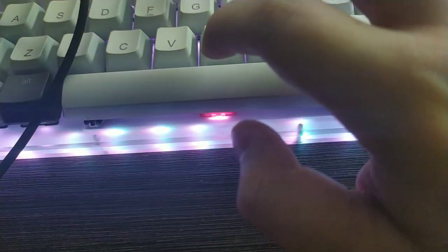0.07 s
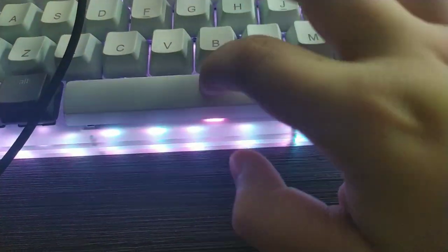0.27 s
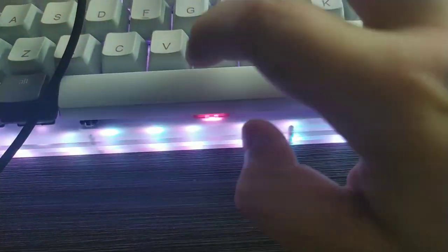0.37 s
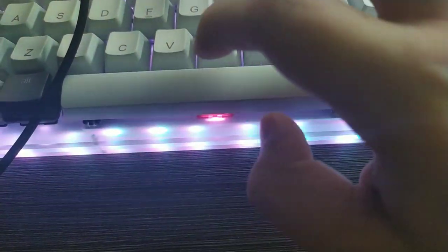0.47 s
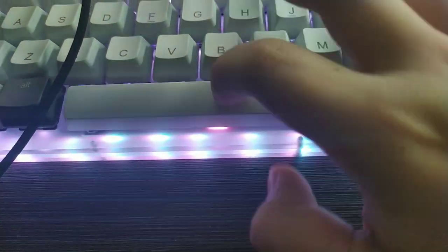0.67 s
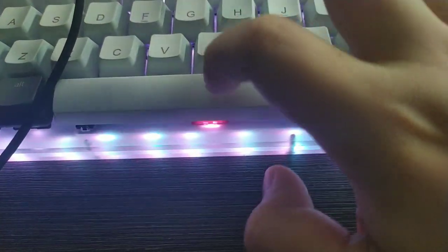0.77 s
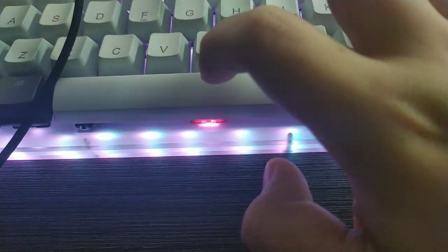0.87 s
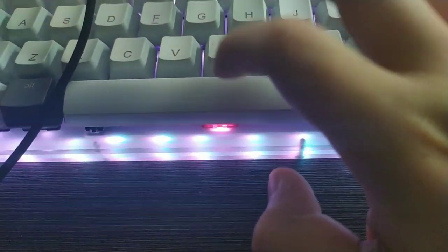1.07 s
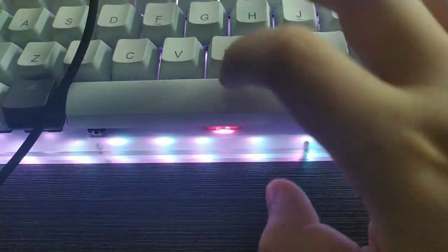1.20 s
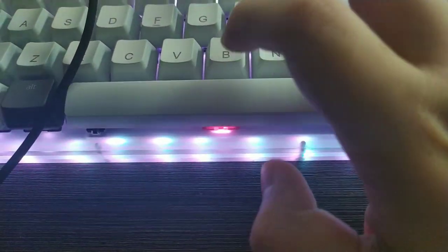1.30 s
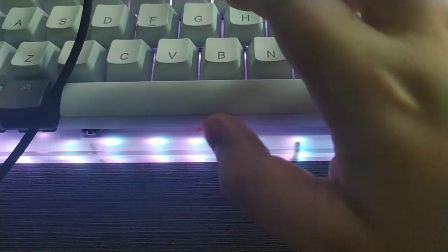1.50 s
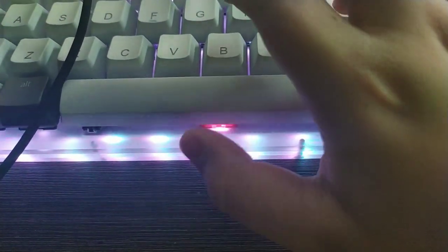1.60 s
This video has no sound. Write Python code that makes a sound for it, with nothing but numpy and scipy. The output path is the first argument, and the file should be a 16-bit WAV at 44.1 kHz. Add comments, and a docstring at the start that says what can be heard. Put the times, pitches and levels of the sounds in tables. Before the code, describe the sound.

A mechanical keyboard's spacebar is struck three times at an even pace. Each sharp plastic clack is followed by a duller click as it springs back, with low desk thuds underneath, close to the microphone in a quiet room.

```python
"""Three sharp clacks sound close by in a quiet room: a finger strikes a mechanical keyboard's spacebar.
Each stroke is a soft touch, a hard clack as the plastic bar bottoms out and a duller one as it springs
back. Every impact excites the damped modes of bar, plate and case; the switch spring rings faintly.
The desk booms under the blows and rumbles with the moving hand; the room answers with a weak tail."""
import sys
import numpy as np
from scipy import signal
from scipy.fft import rfft, irfft, next_fast_len
from scipy.io import wavfile

SR = 44100
rng = np.random.default_rng(int(sys.argv[2]) if len(sys.argv) > 2 else 0)


def unload_wav(signal):
    """Save mono or channel-first audio to the path in sys.argv[1] as 16-bit WAV at rate SR, clipped to [-1, 1]."""
    wavfile.write(
        sys.argv[1],
        SR,
        np.round(np.clip(np.atleast_2d(signal).T, -1, 1) * 32767).astype(np.int16),
    )


N = 72765
T = np.arange(N) / SR

# The bar bottoms out. Each row: start in seconds, ring level in dB, brightness in dB per octave,
# upper-mode snap in dB, crack level in dB, crack tilt in dB per octave, room in dB, desk boom in dB.
PRESSES = [(0.2364, 1.63, .5, -1.7, -2.5, -2.5, -2, 1), (0.6989, -1.24, -0.8, 4, -2.5, 1, 1.5, 3),
           (1.1470, 2.3, 1, -3.5, -6.5, -6.5, -2, -0.5)]
# The bar springs back to its stop. Each row: as for a press.
RELEASES = [(0.3134, 0.33, -0.31, 4.5, -4.5, -17.5, -8, -14.5),
            (0.7915, -3.5, -2.3, 2.3, -18, -1, -13, -12.5),
            (1.2298, 0.1, 0.64, -3.5, -11, -8.5, -10.5, -12)]
# Light contacts of finger and loose bar. Each row: start in seconds, level in dB.
TOUCHES = [(0.2242, -36), (.6900, -39), (1.1352, -37), (0.303, -33), (0.768, -41), (0.7858, -30.5),
           (1.2220, -47)]
# Modes of bar, plate and case. Each row: frequency in Hz, T60 in seconds, press and release levels in dB.
MODES = [(250, 0.064, -29, -31.5), (326.2, 0.069, -29.5, -36), (415, 0.044, -18, -21),
         (567, 0.007, -10.5, -14.5), (716, .046, -19.5, -18.5), (930, .03, -29, -38),
         (1039, 0.021, -22, -24), (1122, 0.05, -29.5, -30), (1282, .023, -17, -18),
         (1442, .025, -22, -20.5), (2118, 0.0089, -15.5, -28), (2800, 0.012, -19.5, -37.5),
         (2963, 0.02, -21, -35)]
# Dips in the ring of each clack. Each row: frequency in Hz, width in Hz.
ANTIRESONANCES = [(607, 89), (1651, 110)]
# The contact crack. Each row: frequency in Hz, level in dB.
CRACK_SPECTRUM = [(1000, -25), (2000, -4), (3000, -6), (3800, 3.5), (4900, -6.5), (6000, -1.5), (6800, -8),
                  (7300, 0), (7800, -11.5), (8700, 2), (10600, -5), (12000, -1.5), (13000, -6),
                  (14000, -12)]
# Modes of the switch spring. Each row: frequency in Hz, level in dB, T60 in seconds.
SPRING_MODES = [(592, -67.5, 1.4), (754, -77.5, 1.3), (1290, -80.5, .5)]
# The spring is set ringing. Each row: start in seconds, level in dB.
TWANGS = [(-.03, -10.5), (.2367, -10.5), (.6995, 3), (1.147, 1.5)]
# The hand bumps the desk. Each row: start in seconds, level in dB, pitch in Hz, T60 in seconds.
BUMPS = [(0.414, -40.5, 176, 0.075), (0.47, -32, 112, 0.12), (0.585, -17.5, 222.3, 0.017),
         (0.819, -28, 126, 0.071), (0.845, -36, 250, 0.027), (0.896, -36.5, 200, .04),
         (1.312, -2.5, 74.5, 0.038), (1.34, -24, 55.6, 0.089), (1.324, -46.5, 324, 0.046)]
# Envelope of the desk rumble. Each row: time in seconds, level in dB.
RUMBLE_LEVEL = [(0, -55), (.06, -69.5), (.2, -65), (.29, -41.5), (.42, -44.5), (.54, -43), (.62, -44),
                (.72, -40.5), (.88, -43.5), (1.05, -49), (1.25, -40), (1.42, -46), (1.55, -54), (1.65, -60)]
# Colour of the desk rumble. Each row: frequency in Hz, level in dB.
RUMBLE_SPECTRUM = [(20, -12), (35, -4), (55, -3.5), (90, 5), (125, 0), (170, -10.5), (260, -24), (400, -35),
                   (700, -43.5), (1500, -60.5), (3000, -77)]
# Colour of the room's tail and the stem's rub. Each row: frequency in Hz, level in dB.
ROOM_SPECTRUM = [(100, -7.5), (400, 1), (750, 1), (1000, -5), (1400, -3), (1750, -7.5), (2300, -4.5),
                 (2700, -5.5), (2980, 2.5), (3300, -10.5), (5000, -14.5), (9000, -18), (12500, -19.5),
                 (14000, -28)]
# Reverberation time. Each row: frequency in Hz, T60 in seconds.
ROOM_T60 = [(300, .62), (700, 0.54), (1400, .56), (2200, 0.41), (3000, 0.36), (6000, 0.39), (13000, 0.45)]
# Background hiss. Each row: frequency in Hz, level in dB.
HISS_SPECTRUM = [(100, 6.5), (1000, -2), (3000, -6.5), (13000, -3.5)]


def amp(db):
    """Amplitude grows tenfold for every 20 dB."""
    return 10 ** (np.asarray(db) / 20)


def along(points, hz):
    """Interpolation of (Hz, value) points on a logarithmic frequency axis."""
    f, v = np.transpose(points)
    return np.interp(np.log(hz + 1), np.log(f + 1), v)


def filtered(x, gain):
    """Filtering multiplies the spectrum by a frequency-dependent gain."""
    size = next_fast_len(2 * N)
    return irfft(rfft(x, size) * gain(np.fft.rfftfreq(size, 1 / SR)), size)[:N]


def noise(gain):
    """Filtered white noise takes the colour of the filter; its rms is 1."""
    x = filtered(rng.standard_normal(N), gain)
    return x / x.std()


def shaped_noise(spectrum):
    """A spectral envelope of (Hz, dB) points colours noise of rms 1."""
    return noise(lambda hz: amp(along(spectrum, hz)))


def fade(t60, t=T):
    """Damping gives exponential decay, 60 dB in t60 seconds."""
    return amp(-60 * t / t60)


def strike(rise_s, t60):
    """A struck vibration builds quickly, then decays exponentially."""
    return (1 - np.exp(-T / rise_s)) * fade(t60)


def sine(hz):
    """Simple harmonic motion, starting at zero displacement."""
    return np.sin(2 * np.pi * hz * T)


def at(start, x):
    """A time shift makes x begin at start seconds, which may be negative."""
    n = round(start * SR)
    return np.pad(x, (max(n, 0), N))[max(-n, 0):][:N]


def room():
    """Reverberation: each clack leaves a diffuse tail, whose treble is absorbed sooner than its bass."""
    earlier_stroke = (-0.17, 0)  # still dying away as the scene opens
    impacts = [(start, room_db) for start, *_, room_db, _ in PRESSES + RELEASES]
    out = np.zeros(N)
    for start, db in [earlier_stroke] + impacts:
        hz, t, spectra = signal.stft(shaped_noise(ROOM_SPECTRUM), SR, nperseg=256)
        decay = fade(along(ROOM_T60, hz)[:, None], t)
        tail = signal.istft(spectra * decay, SR, nperseg=256)[1][:N]
        build_up = 1 - np.exp(-T / 0.0013)
        out += at(start, amp(db - 52) * tail * build_up)
    return out


def desk():
    """Forced and free vibration: the desk booms under each clack, and thuds and rumbles with the hand."""
    push = amp(-29) * sine(hz=85) * fade(t60=0.05)
    resonance = amp(-22) * sine(hz=116.4) * strike(rise_s=0.018, t60=0.23)
    booms = sum(at(start, amp(db) * (push + resonance)) for start, *_, db in PRESSES + RELEASES)
    bumps = np.zeros(N)
    for start, db, hz, t60 in BUMPS:
        soft_onset = (1 - np.exp(-hz * T)) ** 3
        bumps += at(start, 2 * amp(db) * sine(hz) * fade(t60) * soft_onset)
    rumble_db = np.interp(T, *np.transpose(RUMBLE_LEVEL))
    return booms + bumps + amp(rumble_db) * shaped_noise(RUMBLE_SPECTRUM)


def spring():
    """Light damping lets the switch spring ring on; successive excitations add in energy."""
    out = np.zeros(N)
    for hz, db, t60 in SPRING_MODES:
        energy = sum(at(start, amp(twang_db) * fade(t60)) ** 2 for start, twang_db in TWANGS)
        out += amp(db) * sine(hz) * np.sqrt(energy)
    return out


def stem_rub():
    """Sliding friction: the switch stem rubs ever louder on its way down and stops as it lands."""
    peak_db, swell_db_per_s = -49.5, 1701
    swell = sum(amp(peak_db - swell_db_per_s * np.abs(landing - T)) * (T < landing)
                for landing, *_ in PRESSES)
    return swell * shaped_noise(ROOM_SPECTRUM)


def touches():
    """Resonance: soft contacts stir only the bar's middle band, with a faint tick."""
    def band(hz, centre_hz=1240, width_octaves=0.17):
        return np.exp(-0.5 * (np.log2((hz + 1) / centre_hz) / width_octaves) ** 2)

    out = np.zeros(N)
    for start, db in TOUCHES:
        contact = noise(band) + amp(-26.5) * shaped_noise(CRACK_SPECTRUM)
        out += at(start, amp(db) * contact * strike(rise_s=0.003, t60=0.04))
    return out


def clacks(impacts, mode_levels):
    """Impact excitation: the bar hits a stop with a broadband crack, and its damped modes superpose."""
    out = np.zeros(N)
    for start, ring_db, brightness, snap_db, crack_db, tilt, *_ in impacts:
        ring = np.zeros(N)
        for k, ((hz, t60, *_), level) in enumerate(zip(MODES, mode_levels)):
            mode_db = level + brightness * np.log2(hz / 1000) + snap_db * (hz > 1800)
            polarity = (-1) ** k  # neighbouring modes swing in opposite senses
            ring += polarity * amp(mode_db) * sine(hz) * strike(rise_s=0.00021, t60=t60)
        for hz, width in ANTIRESONANCES:
            ring = signal.lfilter(*signal.iirnotch(hz, hz / width, SR), ring)
        grit = noise(lambda hz: amp(along(CRACK_SPECTRUM, hz) + tilt * np.log2(1 + hz / 6000)))
        crack = amp(crack_db - 27) * grit * strike(rise_s=0.0002, t60=0.013)
        out += at(start, amp(ring_db) * ring + crack)
    return out


def scene():
    """Superposition: faint hiss, room, desk and key add at one close microphone."""
    hiss = amp(-97.5) * shaped_noise(HISS_SPECTRUM)
    background = hiss + room() + desk()
    _, _, press_levels, release_levels = np.transpose(MODES)
    key = spring() + stem_rub() + touches()
    key += clacks(PRESSES, press_levels) + clacks(RELEASES, release_levels)
    return (background + key)[None]


def record(dry):
    """Band limiting: a steep low-pass filter removes the highest treble."""
    cutoff_hz = 13950
    return filtered(dry[0], lambda hz: 1 / np.sqrt(1 + (hz / cutoff_hz) ** 160))[None]


dry = scene()
out = record(dry)
unload_wav(out)
```